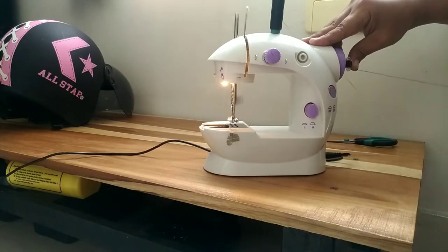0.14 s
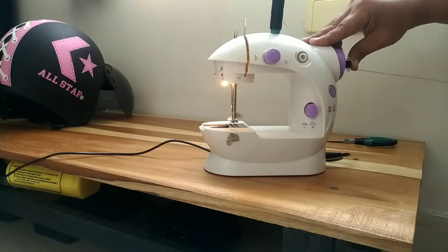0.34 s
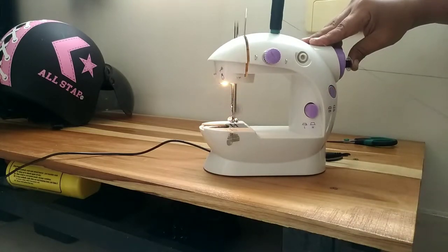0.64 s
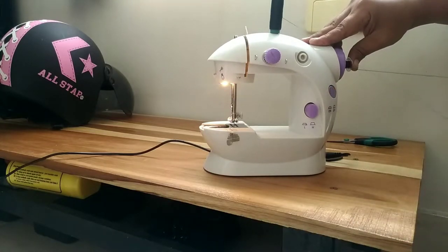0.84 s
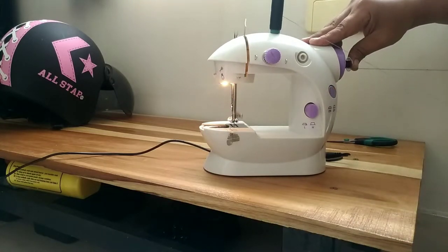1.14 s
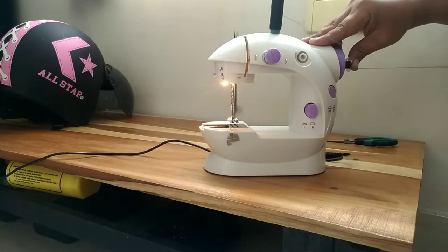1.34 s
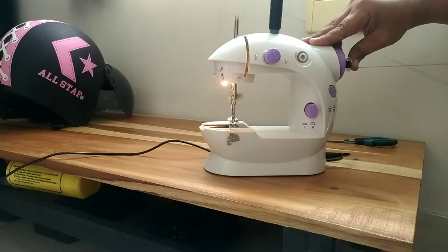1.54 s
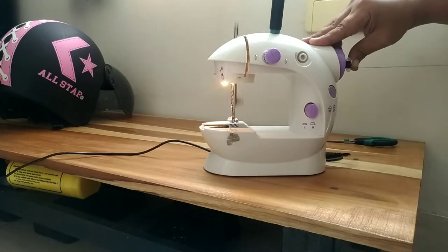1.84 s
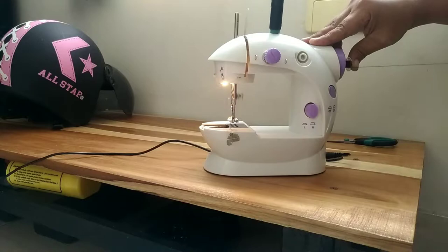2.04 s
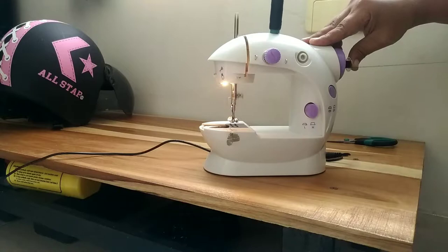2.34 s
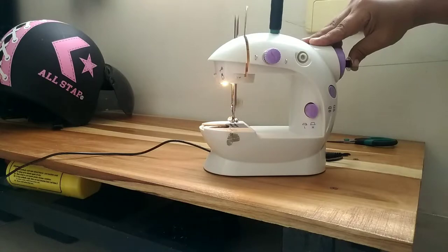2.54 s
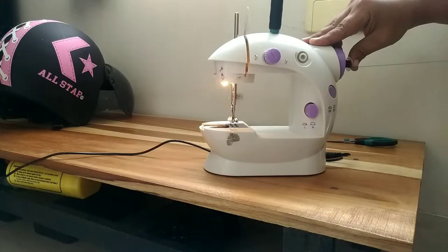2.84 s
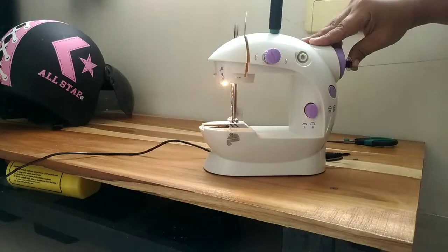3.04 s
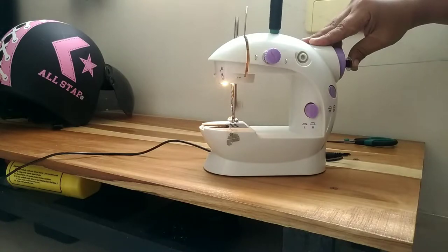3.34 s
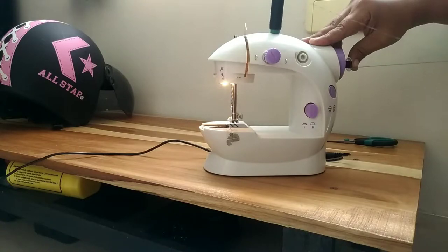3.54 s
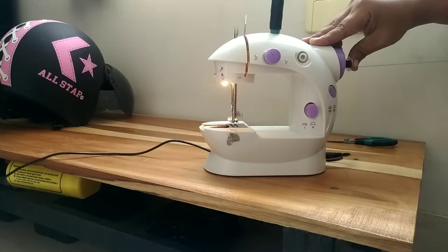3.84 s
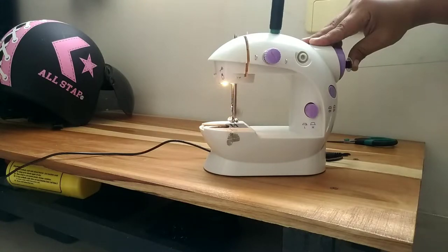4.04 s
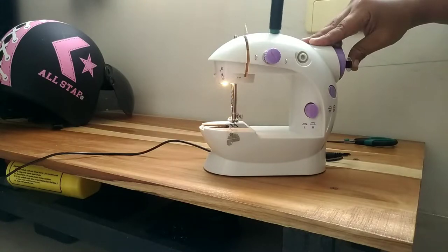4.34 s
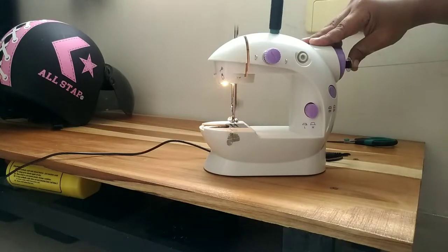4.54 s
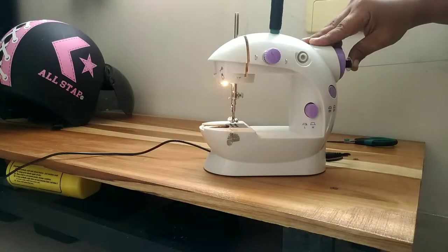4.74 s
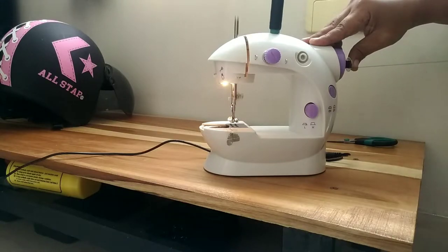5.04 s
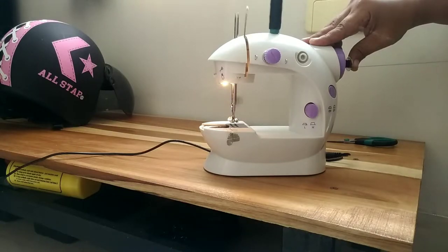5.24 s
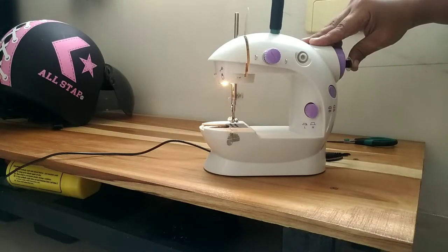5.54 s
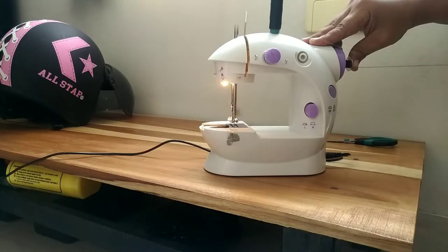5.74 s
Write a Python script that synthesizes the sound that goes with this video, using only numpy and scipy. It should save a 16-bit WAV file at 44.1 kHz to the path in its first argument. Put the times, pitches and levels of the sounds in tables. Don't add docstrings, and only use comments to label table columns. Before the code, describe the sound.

From 0 to about 5.9 seconds a small plastic sewing machine runs without stopping, at nearly constant speed. A low motor hum near 700 Hz sits below a stronger, nasal gear whine around 2 kHz with a softer overtone near 4 kHz. The whine flutters about thirty times a second, giving a rough, purring buzz. Roughly six times a second the needle crank loads the motor, the pitch dips slightly, and the linkage knocks with a soft thump through casing and table. Dense loose-part rattle fills the midrange. Knocks are uneven, with stronger ones near 1.8, 2.3, 2.85, 3.4 and 4.2 seconds and crisper ticks near 0.6 and 1.6. Level rises very slightly toward the end. Faint wind thuds and distant traffic rumble stay underneath. The room is hard, with a short tail; the phone pickup is close, wide in treble, occasionally clipped, and cuts off mid-run.

```python
import sys
import numpy as np
from scipy import signal
from scipy.fft import rfft, irfft, next_fast_len
from scipy.io import wavfile
from scipy.ndimage import uniform_filter1d

SR = 44100
rng = np.random.default_rng(int(sys.argv[2]) if len(sys.argv) > 2 else 0)


def dump_mix(stems):
    frames = np.atleast_2d(stems).T
    limited = np.clip(frames, -1, 1)
    pcm = np.round(limited * 32767).astype(np.int16)
    wavfile.write(sys.argv[1], SR, pcm)


def gain_from_db(level_db):
    decades = np.asarray(level_db, float) / 20
    return 10 ** decades


N = 260190
SIZE = next_fast_len(N + SR // 2)
HZ = np.arange(SIZE // 2 + 1) * SR / SIZE
T = np.arange(N) / SR

PINION_TEETH, GEAR_TEETH = 9, 68
# (centre [Hz], width [Hz], level under thumps [dB], level under rattle [dB])
SHELL_MODES = [(175, 17, 6, -42.5), (230.4, 64, -2.5, -39.5), (292.7, 7.8, -48, -40.5),
               (506, 35, -14.5, -36.5), (533, 5.7, -14, -46.5), (718, 37, 0, -37), (790, 67, -0.5, -34),
               (877, 34, 7.5, -39), (1164, 44, 5.5, -33), (1412, 130, -9, -32), (1783, 140, -20, -34),
               (4100, 270, -35, -55), (5840, 90, -40, -45), (8100, 520, -40, -54)]


def level(x, db):
    return x * gain_from_db(db) / np.sqrt(np.mean(x ** 2))


def over_hz(points):
    hz, value = np.transpose(points)
    return np.interp(np.log(HZ + 1), np.log(hz), value)


def through(x, gain):
    return irfft(rfft(x, SIZE) * gain, SIZE)[..., :N]


def mode(hz, width_hz):
    return 1j * HZ * width_hz / (hz ** 2 - HZ ** 2 + 1j * HZ * width_hz)


def walk(rate_hz):
    hold = int(SR / rate_hz)
    steps = np.repeat(rng.standard_normal(N // hold + 1), hold)
    slewed = uniform_filter1d(uniform_filter1d(steps, hold), hold)
    return level(slewed[:N], 0)


def ports(pair):
    # (frequency [Hz], likeness at the two ports [0-1])
    likeness = [(60, 0.9), (130, 0.97), (330, 0.79), (640, 0.76), (1410, 0.09), (3100, 0.07), (6820, 0.01),
                (15000, 0)]
    alike = np.sqrt(np.clip(over_hz(likeness), 0, 1))
    mid = np.sqrt(1 + alike) * pair[0]
    side = np.sqrt(1 - alike) * pair[1]
    return (mid + side * [[1], [-1]]) / np.sqrt(2)


def causal(gain):
    cepstrum = irfft(np.log(gain), SIZE)
    cepstrum[1:SIZE // 2] *= 2
    cepstrum[SIZE // 2 + 1:] = 0
    return np.exp(rfft(cepstrum))


def whine(gear, drift, force_db):
    # (multiple of tooth rate, level [dB], swing per gear turn [dB], lead [turns], right port early by [rad])
    partials = [(1, -27.5, 5, 0.067, 0.5), (2, -28, 11, 0.0, -0.96), (3, -38, 6.5, 0.053, 0.84),
                (4, -45.5, 1, .02, 0.16), (5, -58, 7, .02, 0.15), (6, -61.5, 8, .02, 0)]
    wobble_teeth, wobble_lead_turns, slack_teeth = 0.18, 0.32, 0.026
    wobble = wobble_teeth / GEAR_TEETH * np.sin(2 * np.pi * (gear + wobble_lead_turns))
    teeth = GEAR_TEETH * (gear + drift + wobble) + slack_teeth * walk(45) + 0.022 * walk(400)
    out = 0
    for k, db, swing_db, lead_turns, early_rad in partials:
        angle = 2 * np.pi * (gear + lead_turns)
        sides_rad = np.array([0 * gear, early_rad + 0.12 * walk(60)])
        swell_db = swing_db * (np.cos(angle) + 0.088 * np.sin(2 * angle))
        swell_db = swell_db + 0.54 * walk(24.9) + 1.1 * walk(200)
        tone = np.sin(2 * np.pi * k * teeth + sides_rad)
        out = out + level(gain_from_db(swell_db + force_db / k) * tone, db)
    return out


def hum(gear, drift, speed_pct):
    # (multiple of shaft rate, level [dB])
    partials = [
        (1, -44),
        (3, -27.5),
        (5, -44),
        (6, -40),
        (12, -46),
    ]
    wobble_pct, fastest_at_turn = 0.8, 0.85
    stiffness, db_per_pct = 0.32, 1.45
    hunt = wobble_pct / (200 * np.pi) * np.sin(2 * np.pi * (gear - fastest_at_turn))
    shaft = GEAR_TEETH / PINION_TEETH * (gear + stiffness * drift + hunt) + 0.021 * walk(30)
    swell_db = 1.1 * np.cos(2 * np.pi * (gear + 0.19)) + db_per_pct * speed_pct
    out = 0
    for k, db in partials:
        out = out + level(gain_from_db(swell_db + 1.44 * walk(16)) * np.sin(2 * np.pi * k * shaft), db)
    return out


def stitch(crank):
    # (share of the crank turn, width [turns], mesh force [dB])
    loads = [(.19, 0.024, 8), (.53, 0.11, 2.5), (.99, .06, 2.8)]
    brake_from, brake_to, free_at, top_speed_at = 0.114, 0.198, 0.36, 0.846
    before_pct, slowest_pct, free_pct, fastest_pct = 0.74, -2.51, -0.51, 1.114
    speed_pct = np.interp(crank, (brake_from, brake_to, free_at, top_speed_at),
                          (before_pct, slowest_pct, free_pct, fastest_pct), period=1)
    force_db = 0
    for share, width_turns, db in loads:
        away = (crank - share + 0.5) % 1 - 0.5
        force_db = force_db + db * np.exp(-(away / width_turns) ** 2)
    rattle_db = 0.37 * np.cos(2 * np.pi * (crank - 0.88))
    return speed_pct, force_db, rattle_db


def knocks(crank):
    # (time [s], peak [dB], brightness [dB])
    stray = [(0.025, -23, -28), (0.349, -14, -16), (0.569, -19, -7), (0.984, -32, -33), (1.039, -19, -15),
             (1.305, -21, -16), (1.623, -18, -9), (1.79, -6, -24), (2.199, -20, -14), (2.27, -10, -17),
             (2.849, -10, -34), (2.909, -22, -30), (3.059, -17, -15), (3.374, -9, -23), (3.698, -14, -22),
             (4.09, -11, -22), (4.178, -10, -24), (4.5, -16, -21), (5.131, -16, -14.5), (5.289, -32, -26),
             (5.609, -30, -25)]
    s = T[np.flatnonzero(np.diff(np.floor(crank - 0.168)))]
    chance = rng.standard_normal((len(s), 2))
    peak_db = -10 + 4.5 * chance[:, 1]
    usual = np.transpose([s + 0.0022 * chance[:, 0], peak_db, -25 + 0 * s])
    return np.vstack([usual, stray])


def rattle(gear, crank, rattle_db):
    # (frequency [Hz], level [dB])
    spectrum = [(70, -37.5), (130, -19), (300, -15.5), (390, -14), (600, -14.5), (720, -10.5),
                (1500, -12.5), (2500, -12.5), (4450, -17), (4900, -20), (6300, -25), (6800, -28.5),
                (8200, -27), (12500, -42.5)]
    total_db, knock_db, rise_s, decay_s = -18, 9.0, 0.0026, 0.0089
    tick_size = np.minimum(rng.exponential(size=(2, 1, N // 24 + 1)), 4)
    ticks_db = 1.9 * tick_size.repeat(24, axis=2)[..., :N]
    force = np.zeros((2, 1, N + 2048))
    force[..., :N] = gain_from_db(ticks_db + rattle_db - 2.5 + 0.073 * np.cos(2 * np.pi * gear))
    force[1, 0, :N] *= gain_from_db(0.46 * walk(30))
    fade = np.exp(-T[:2048] / decay_s) * np.minimum(T[:2048] / rise_s, 1)
    for s, db, bright_db in knocks(crank):
        start = int(s * SR)
        peaks = gain_from_db(db + knock_db + np.array([0, bright_db + 17.5]))
        force[:, 0, start:start + 2048] += np.outer(peaks, fade)
    dull, bright = rfft(force[..., :N] * rng.standard_normal((2, 2, N)), SIZE)
    treble = HZ ** 4 / (HZ ** 4 + 2550.0 ** 4)
    push = np.sqrt(1 - treble) * dull + np.sqrt(treble) * bright
    broad = gain_from_db(over_hz(spectrum)) ** 2
    power = gain_from_db(total_db) ** 2 * broad / np.mean(broad)
    for hz, width_hz, _, db in SHELL_MODES:
        power = power + gain_from_db(db) ** 2 * np.abs(mode(hz, width_hz)) ** 4 * SR / width_hz
    return irfft(ports(push) * causal(np.sqrt(power)), SIZE)[:, :N]


def thumps(crank):
    # (share of the crank turn, level [dB])
    turnings = [
        (.2, -23),
        (0.391, -28),
    ]
    push_s = 0.00049
    blows = np.zeros(N)
    for share, db in turnings:
        at = np.flatnonzero(np.diff(np.floor(crank - share)))
        chance = rng.standard_normal((len(at), 2))
        hit = np.clip(at + (90 * chance[:, 0]).astype(int), 0, N - 1)
        blows[hit] = gain_from_db(db + 1.9 * np.clip(chance[:, 1], -2, 1.3))
    soft = np.exp(-(HZ * push_s) ** 2)
    body = sum(gain_from_db(db) * mode(hz, width_hz) / width_hz for hz, width_hz, db, _ in SHELL_MODES)
    return 4600 * through(blows, soft * body)


def room():
    t = T[:SR // 2]
    paths = np.ones((2, len(HZ)), complex)
    for t60_s, db in ((0.015, 2.5), (0.57, -9.5)):
        echo = rng.standard_normal((2, len(t))) * np.exp(-np.log(1000) * t / t60_s)
        echo = echo / np.sqrt(np.sum(echo ** 2, axis=1, keepdims=True))
        paths += gain_from_db(db) * ports(rfft(echo, SIZE))
    table_echo_s, table_gain, table_from_hz = 0.001062, 0.2, 8000
    gain = table_gain * HZ ** 4 / (HZ ** 4 + table_from_hz ** 4)
    table = (1 + gain * np.exp(-2j * np.pi * HZ * table_echo_s)) / np.sqrt(1 + gain ** 2)
    return table * paths / np.sqrt(uniform_filter1d(np.abs(paths) ** 2, size=SIZE // 1500))


def rumble():
    # (time [s], rise [dB], length [s])
    gusts = [(.2, 5, .1), (.4, 14, .06), (.65, 7, .1), (1.82, 2, .05), (2.03, 13, .08), (2.2, 11, .04),
             (2.452, 12, 0.14), (2.7, 8, .06), (2.98, 9, .1), (3.35, 3, .1), (3.63, 13, 0.073),
             (4.7, -9, .2), (5.13, -5, .05), (5.35, 11, 0.11), (5.8, 3, .12)]
    # (time [s], level [dB])
    traffic = [(0, -33.5), (.5, -39.5), (1.15, -40.5), (2.0, -35.5), (2.9, -42), (3.8, -33), (4.5, -36.5),
               (5.3, -37), (5.9, -39.5)]
    deep_db, gust_share = -46.5, 0.13
    gust_db = sum(db * np.exp(-((T - s) / length_s) ** 2) for s, db, length_s in gusts)
    traffic_db = np.interp(T, *np.transpose(traffic)) + gust_share * gust_db
    out = 0
    for db, hz, width_hz, side in ((deep_db + gust_db, 33, 22, 0.36), (traffic_db, 80, 90, 0.43)):
        mid, other = through(rng.standard_normal((2, N)), mode(hz, width_hz) ** 2)
        out = out + gain_from_db(db) * level(mid + side * other * np.array([[1], [-1]]), 0)
    return out


def scene():
    gear_turns = [(0.0, 0.12), (0.6, 18.47), (1.2, 36.77), (1.8, 55.11), (2.4, 73.49), (3.0, 91.89),
                  (3.6, 110.28), (4.2, 128.63), (4.8, 146.99), (5.4, 165.45), (5.9, 181.04)]
    # (time [s], machine level [dB])
    run = [(0, -17.5), (1.2, -16.5), (2.9, -16), (4.4, -16.5), (5.9, -15.5)]
    space = room()
    gear = np.interp(T, *np.transpose(gear_turns))
    crank = gear * 9 / 44
    speed_pct, force_db, rattle_db = stitch(crank)
    drift = np.cumsum((speed_pct - speed_pct.mean()) / 100 * np.gradient(gear))
    machine = whine(gear, drift, force_db) + hum(gear, drift, speed_pct)
    machine = machine + rattle(gear, crank, rattle_db) + thumps(crank)
    run_db = np.interp(T, *np.transpose(run))
    return through(machine * gain_from_db(run_db - run_db.mean()), space) + rumble()


def gate(x):
    under_db, from_hz = 1.0, 4550
    hz, _, cells = signal.stft(x, SR, nperseg=2048)
    patch = uniform_filter1d(np.abs(cells) ** 2, size=5, axis=1)
    mask = uniform_filter1d(patch.mean(axis=(0, 2)), size=90) * gain_from_db(under_db) ** 2
    depth = np.clip((hz - from_hz) / 6000, 0, 1) * 0.7 + 0.3 * (hz > from_hz)
    kept = cells * (patch > (mask * depth)[:, None])
    return signal.istft(kept, SR, nperseg=2048)[1][:, :N]


def low_pass(x):
    return signal.sosfilt(signal.butter(12, 16770, fs=SR, output="sos"), x)


def record(dry):
    # (frequency [Hz], left minus right [dB])
    port_tilt = [(60, -.5), (380, -0.5), (700, 2.5), (1290, 0), (2380, 2), (3600, -2.5), (4200, 1),
                 (7000, -1), (8800, 6), (9700, 7), (10800, 7.5), (13200, 0), (14500, 13.5)]
    tilt_db = over_hz(port_tilt) / 2
    left = gain_from_db(tilt_db) * (1 + 1.04 * mode(14940, 820)) * (1 + 0.9 * mode(2052, 81)) * (1 + 0.38 * mode(4140, 91))
    right = gain_from_db(-tilt_db) * (1 + 1.68 * mode(2103, 30)) * (1 + 0.5 * mode(4125, 67))
    heard = np.clip(through(dry, np.array([left, right])) * gain_from_db(0.97), -1, 1)
    top = 1 / np.sqrt(1 + (HZ / 15450) ** 300)
    return low_pass(through(gate(heard), top))


dry = scene()
out = record(dry)
dump_mix(out)
```